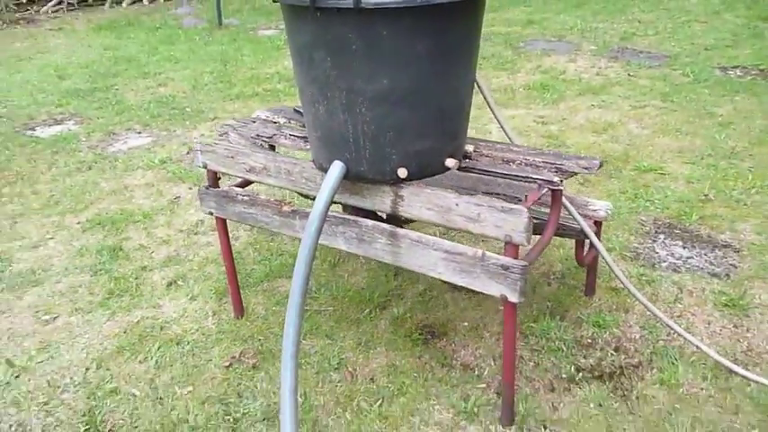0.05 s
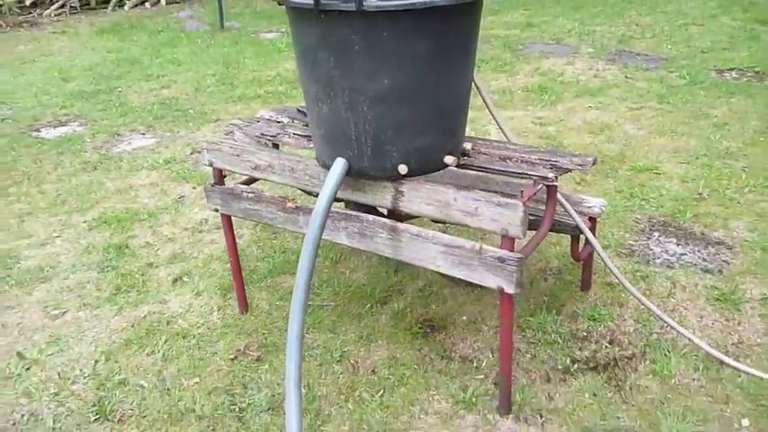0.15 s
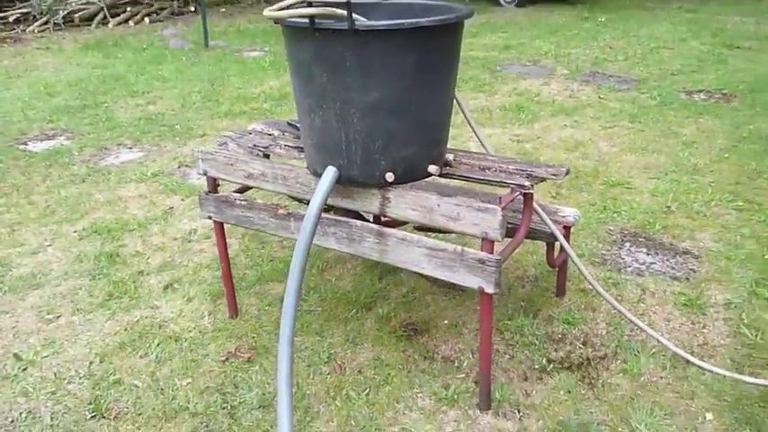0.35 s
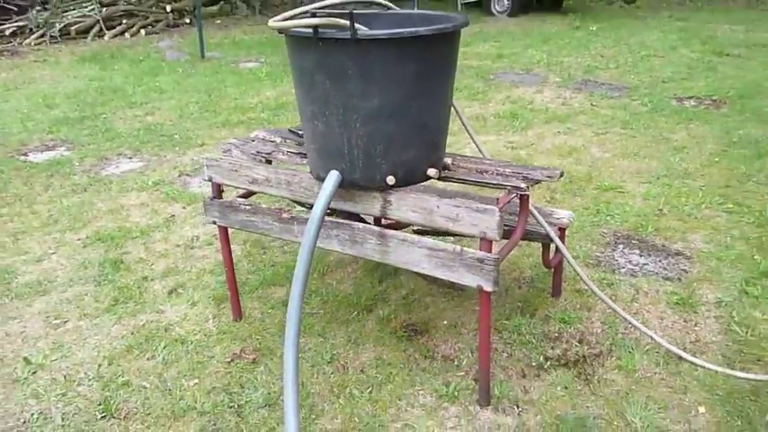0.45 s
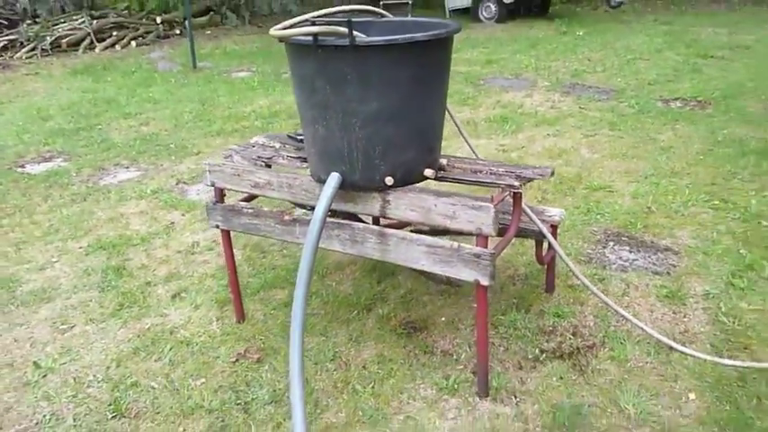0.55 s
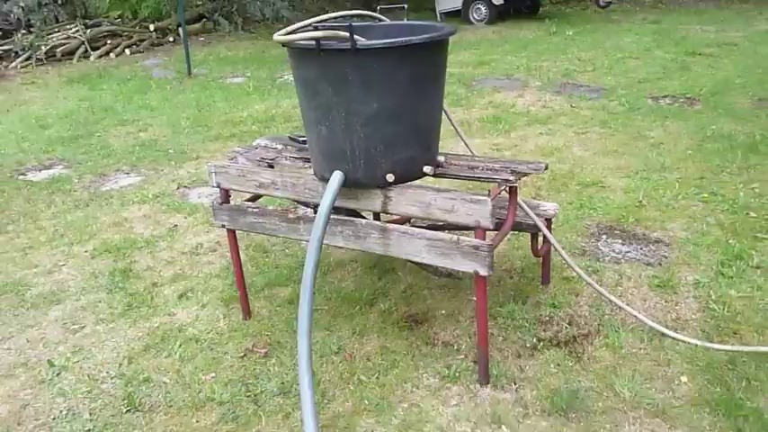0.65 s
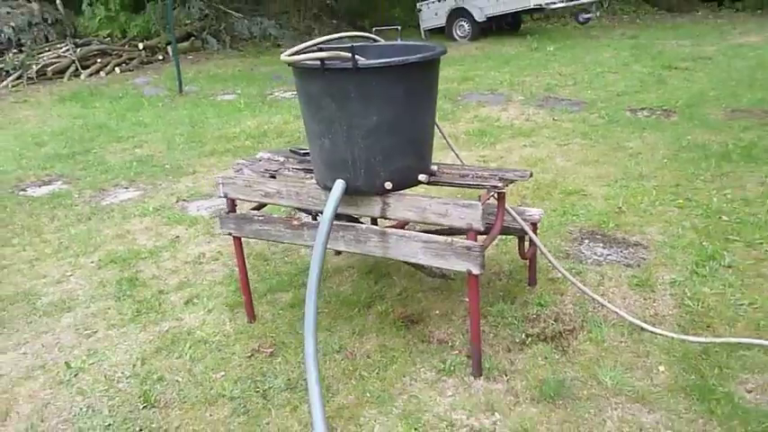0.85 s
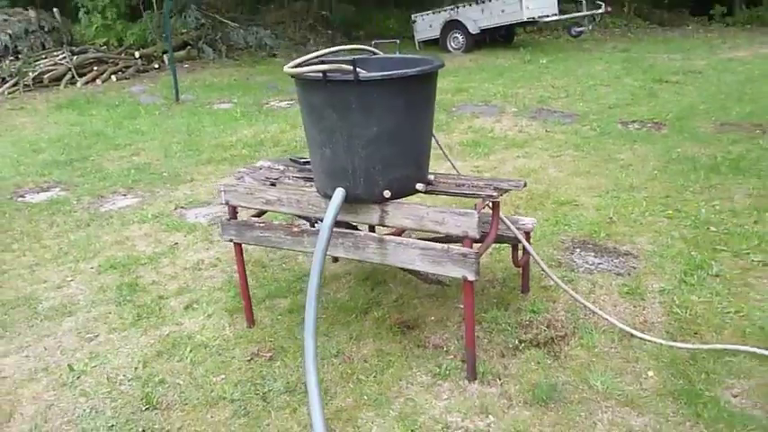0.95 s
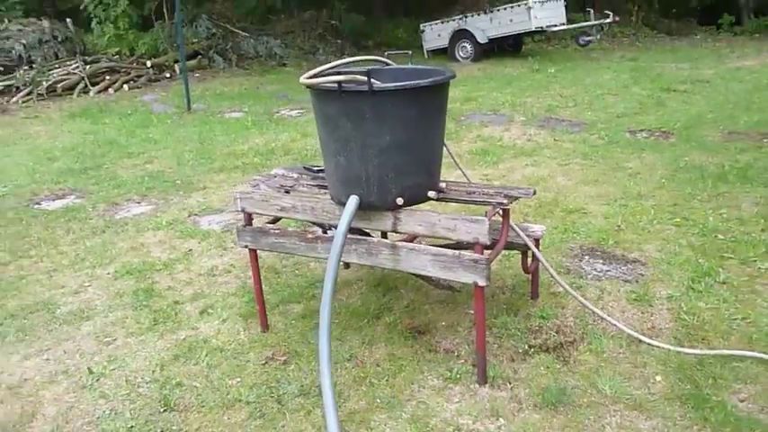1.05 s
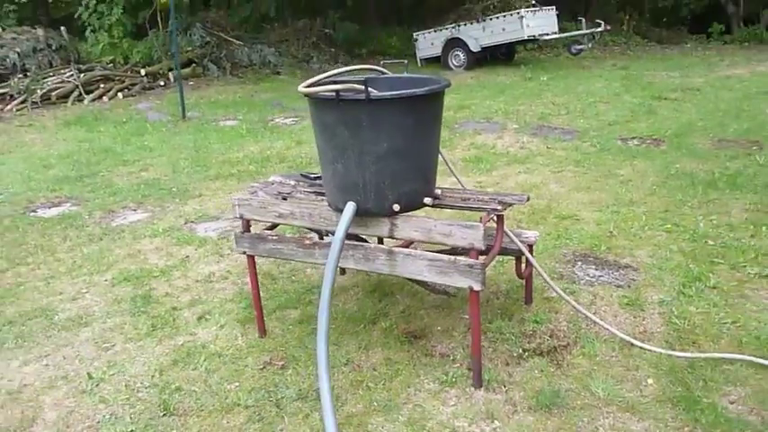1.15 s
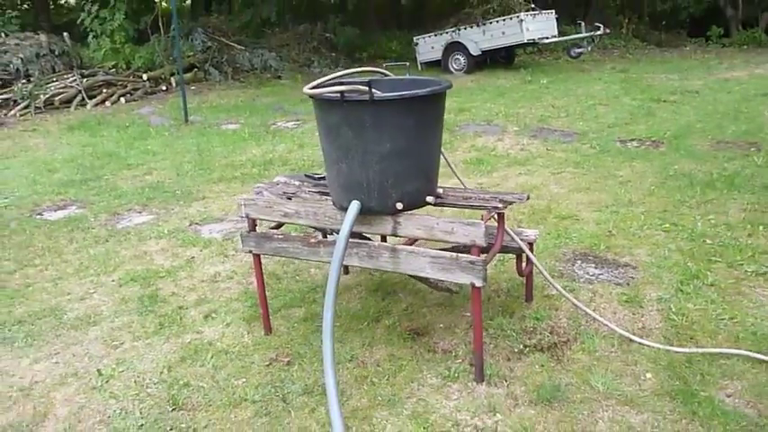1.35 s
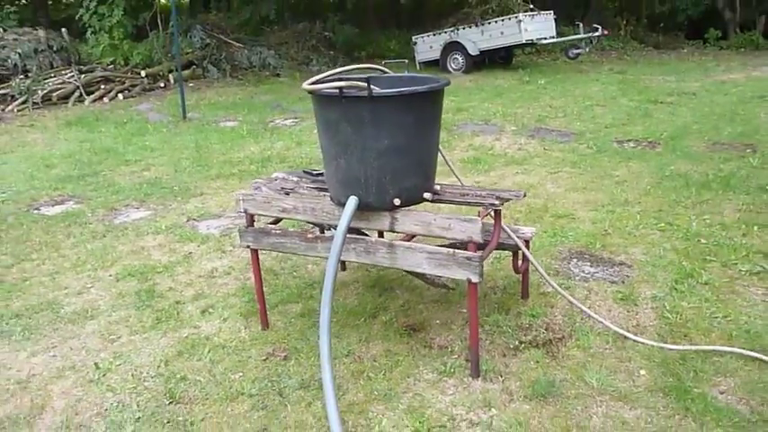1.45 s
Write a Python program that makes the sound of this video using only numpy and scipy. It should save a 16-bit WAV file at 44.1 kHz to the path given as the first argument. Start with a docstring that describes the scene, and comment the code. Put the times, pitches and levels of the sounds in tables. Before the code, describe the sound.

Something plastic knocks once, hard and dry, close to the microphone, then settles with a softer knock and small ticks. Behind it, water runs quietly into a tub on a lawn, with light wind and a distant motor hum.

```python
"""Plastic knock by a filling tub

A pump feeds a tub on a lawn: water rushes steadily, a motor hums far off and wind stirs the trees.
Up close, a short grainy swell rises into one hard, dry knock of something plastic, which settles with
a softer knock and small ticks. The hard knock ducks the recorder's gain, which creeps back up."""
import sys
import numpy as np
from scipy import signal
from scipy.fft import rfft, irfft
from scipy.io import wavfile

SR = 44100
rng = np.random.default_rng(int(sys.argv[2]) if len(sys.argv) > 2 else 0)


def digitize_waveform(pressure):
    """Quantize a signal to 16-bit integers and store it at the path in sys.argv[1].

    Rows of a 2-D input are taken as channels; values are limited to [-1, 1].
    """
    field = np.atleast_2d(pressure).T
    bounded = np.clip(field, -1, 1)
    quanta = np.round(bounded * 32767).astype(np.int16)
    wavfile.write(sys.argv[1], SR, quanta)


N = 66150
T = np.arange(N) / SR

# The plastic's modes in the hard knock. Each row: pitch in Hz, level in dB, swell and fade time in ms.
KNOCK_MODES = [(191, -18, 1.14), (414, -12.5, 0.69), (667, -2, 0.53), (2025, -18, 0.31), (2518, -3, 0.37),
               (3085, -18, 0.9), (5490, -3.5, 0.3)]
KNOCK_S, THUMP_BELOW_HZ, THUMP_LAG_MS = .21805, 1000, 0.33
KNOCK_LOW_CUT_HZ = 123
# The grainy swell into the knock. Each row: time in seconds, level in dB.
SWELL_LEVEL = [(.165, -63), (.184, -45.5), (.2, -46.5), (.21, -33.5), (.2135, -24), (.2175, -28),
               (.223, -47.5), (.23, -72)]
# The tone of the grit in the swell and the taps. Each row: frequency in Hz, gain in dB.
GRIT_COLOUR = [(100, -0.5), (600, 1.5), (1500, 0), (3200, -1), (4500, -3.5), (6200, -2.5), (8000, -27)]
GRAINS_PER_S = 10000
# Lighter contacts with two resonances. Each row: start in seconds, lower pitch in Hz, its level in dB,
# upper pitch in Hz, its level in dB, swell and fade time in ms.
TAPS = [(0.1829, 420, -29.5, 1400, -33.5, 0.57), (.303, 1900, -46, 2300, -36, 2.0),
        (.3147, 524, -15, 1170, -25.5, 0.62), (0.3164, 1760, -36.5, 2270, -33, 2.05),
        (0.3238, 2210, -21, 3340, -21, 0.48), (.3323, 700, -33.5, 5650, -39, .35),
        (0.3642, 3900, -22, 6600, -21, 0.15), (0.593, 2960, -29.5, 5400, -29.5, .7),
        (0.5964, 3040, -30.5, 5860, -35, 0.6), (.6888, 3520, -40, 7100, -36.5, 0.33),
        (.6997, 3000, -44, 6450, -34.5, 0.21), (0.7331, 3650, -27.5, 4660, -27, 0.24),
        (0.7566, 3300, -49, 7200, -44.5, 1.1), (0.7796, 5500, -54, 7300, -35.5, 0.31),
        (.9205, 150, -29, 360, -31, 1.13), (1.104, 3540, -39, 5540, -37, 0.26),
        (1.346, 4500, -42, 7000, -36, 0.17), (1.43, 4000, -46, 7100, -37.5, 0.55),
        (1.462, 2970, -40, 3340, -28, 0.45)]
TAP_GRIT_DB, TAP_GRIT_MS = -9.5, 2.3

# The steady flow of water. Each row: time in seconds, level in dB.
WATER_LEVEL = [(0, -48.5), (.18, -50), (.26, -49), (.7, -49.5), (1.1, -51), (1.5, -50.5)]
# The water's bright hiss. Each row: frequency in Hz, gain in dB.
WATER_COLOUR = [(300, -18), (1000, -7), (2200, 1), (3300, 1), (4500, -1.5), (6500, -2.5), (8000, -9)]
DROPS_PER_S, DROP_CYCLES, DROP_DB, DROP_SPREAD_DB = 900, 6, -7, 3.5

# Gentle swells of wind in the trees. Each row: time in seconds, level in dB.
WIND_LEVEL = [(0, -45.5), (.2, -45.5), (.45, -44.5), (.75, -45.5), (1.0, -43.5), (1.25, -45), (1.5, -43)]
# The wind's midrange rush. Each row: frequency in Hz, gain in dB.
WIND_COLOUR = [(150, -14.5), (400, -7), (700, -2.5), (1050, 0.5), (1600, -5.5), (2300, -9), (3300, -26),
               (8000, -40)]
# The rise and fall of the air's rumble. Each row: time in seconds, level in dB.
RUMBLE_LEVEL = [(0, -50), (.17, -47.5), (.4, -45.5), (.7, -46.5), (.95, -45.5), (1.2, -49.5), (1.5, -47)]
# The rumble's dark tone. Each row: frequency in Hz, gain in dB.
RUMBLE_COLOUR = [(25, -15), (50, -0.5), (115, 1), (180, -1.5), (350, -4), (550, -7), (1200, -34.5),
                 (4000, -49)]

# The motor's harmonics. Each row: multiple of the hum's pitch, relative level in dB.
HUM_HARMONICS = [(1, -0.5), (2, -5)]
# The hum's slow swell. Each row: time in seconds, level in dB.
HUM_LEVEL = [(0, -58), (.3, -57), (.5, -52), (1.1, -50.5), (1.5, -54.5)]
HUM_HZ, HUM_WANDER, HUM_SWING_DB = 61.5, .04, 3

GAIN_KNEE_DB, GAIN_SLOPE, GAIN_RECOVERY_DB_PER_S, GAIN_ATTACK_S = -21, 0.22, 3.0, 0.0093
NOTCH_HZ, NOTCH_Q, OVERLOAD_TOP, CUTOFF_HZ = 2900, 17, .8, 7650


def knock():
    """The hard hit: the contact cracks, and the body gives way just after with a thump."""
    lag_s = THUMP_LAG_MS / 1000
    return sum(ring(KNOCK_S + lag_s * (hz < THUMP_BELOW_HZ), hz, db, ms) for hz, db, ms in KNOCK_MODES)


def swell():
    """A short, grainy swell of noise rises into the knock."""
    gate = T < SWELL_LEVEL[-1][0]
    return level(SWELL_LEVEL) * gate * coloured(grains(GRAINS_PER_S, spread_db=2), GRIT_COLOUR)


def taps():
    """Soft knocks and ticks: each contact rings two resonances and rubs briefly as it settles."""
    rings = rub = 0
    for start, low_hz, low_db, high_hz, high_db, ms in TAPS:
        rings += ring(start, low_hz, low_db, ms) + ring(start, high_hz, high_db, ms)
        fade = (T > start) * np.exp(-np.abs(T - start) * 1000 / TAP_GRIT_MS)
        rub += from_db(high_db + TAP_GRIT_DB) * fade
    grit = coloured(grains(GRAINS_PER_S, spread_db=2), GRIT_COLOUR)
    return rings + rub * grit


def water():
    """Water runs into the tub: a smooth hiss dotted with tiny splashes, each a short pitched ping."""
    clicks = grains(DROPS_PER_S, DROP_SPREAD_DB)
    pitches_hz = np.geomspace(900, 7500, 16)
    pitch_index = rng.integers(0, len(pitches_hz), N)
    drops = 0
    for k, hz in enumerate(pitches_hz):
        decay = from_db(-60 * hz / (DROP_CYCLES * SR))  # 60 dB down after DROP_CYCLES cycles
        angle = 2 * np.pi * hz / SR
        hits = clicks * (pitch_index == k) + 1e-18
        drops += signal.lfilter([0, np.sin(angle)], [1, -2 * decay * np.cos(angle), decay ** 2], hits)
    hiss = coloured(rng.standard_normal(N), WATER_COLOUR)
    return level(WATER_LEVEL) * (hiss + from_db(DROP_DB) * rms_one(drops))


def wind():
    """Air stirs the trees: a broad, lightly fluttering rush over a bed of low rumble."""
    rush = coloured(rng.standard_normal(N), WIND_COLOUR) * from_db(0.73 * drift(12))
    rumble = coloured(rng.standard_normal(N), RUMBLE_COLOUR) * from_db(1.4 * drift(11))
    return level(WIND_LEVEL) * rush + level(RUMBLE_LEVEL) * rumble


def motor():
    """A far-off motor hums low; its pitch wanders and each harmonic wavers in level on its own."""
    pitch_hz = HUM_HZ * (1 + HUM_WANDER * drift(9.5))
    phase = 2 * np.pi * np.cumsum(pitch_hz) / SR
    hum = sum(from_db(db + HUM_SWING_DB * drift(9)) * np.sin(k * phase) for k, db in HUM_HARMONICS)
    return level(HUM_LEVEL) * np.sqrt(2) * hum


def ring(start, hz, db, ms):
    """A heavily damped resonance that swells to its peak in `ms` and dies away."""
    t = np.maximum(T - start, 0)
    age = t * 1000 / ms
    return from_db(db) * age * np.exp(1 - age) * np.sin(2 * np.pi * hz * t)


def grains(per_s, spread_db):
    """A random scatter of clicks, uneven in size."""
    sizes = from_db(spread_db * np.minimum(rng.exponential(1, N), 4))
    return sizes * rng.choice([-1, 1], N) * (rng.random(N) < per_s / SR)


def coloured(x, colour):
    """Shape a steady sound with an EQ curve and bring it to rms 1."""
    hz, db = np.transpose(colour)
    bins_hz = np.maximum(np.fft.rfftfreq(N, 1 / SR), 1)
    gain = from_db(np.interp(np.log(bins_hz), np.log(hz), db)) * (bins_hz < CUTOFF_HZ + 1000)
    return rms_one(irfft(rfft(x) * gain, N))


def drift(rate_hz):
    """A smooth random wobble of rms 1, mostly slower than `rate_hz`."""
    hop, warm_up = 40, 2000
    pole = np.exp(-2 * np.pi * rate_hz * hop / SR)
    noise = rng.standard_normal(N // hop + warm_up + 2)
    slow = signal.lfilter([1], [1, -2 * pole, pole ** 2], noise)[warm_up:]
    return np.interp(np.arange(N) / hop, np.arange(len(slow)), rms_one(slow))


def level(rows):
    """A fader ride through points of seconds and dB."""
    return from_db(np.interp(T, *np.transpose(rows)))


def from_db(db):
    """Decibels to gain."""
    return 10 ** (np.asarray(db) / 20)


def rms_one(x):
    """Scale to rms 1."""
    return x / np.sqrt(np.mean(x ** 2) + 1e-20)


def scene():
    """The mono mix in open air, no echo; a low-cut filter trims deep bass from swell, knock and taps."""
    low_cut = signal.butter(2, KNOCK_LOW_CUT_HZ, "high", fs=SR, output="sos")
    foreground = signal.sosfilt(low_cut, swell() - knock() + taps())
    return (foreground + wind() + water() + motor())[None]


def record(dry):
    """The recorder ducks on peaks and creeps back, cuts a narrow notch, clips and trims the top."""
    peak_db = 20 * np.log10(np.abs(dry[0]) + 1e-9)
    duck_db = GAIN_SLOPE * np.maximum(peak_db - GAIN_KNEE_DB, 0)
    recovery_db = GAIN_RECOVERY_DB_PER_S * T
    held_db = np.maximum.accumulate(duck_db + recovery_db) - recovery_db
    attack = np.exp(-1 / (GAIN_ATTACK_S * SR))
    ducked = dry * from_db(-signal.lfilter([1 - attack], [1, -attack], held_db))
    notched = signal.lfilter(*signal.iirnotch(NOTCH_HZ, NOTCH_Q, fs=SR), ducked)
    clipped = np.clip(notched, -OVERLOAD_TOP, OVERLOAD_TOP)
    top_cut = signal.ellip(8, .05, 50, CUTOFF_HZ, fs=SR, output="sos")
    return signal.sosfiltfilt(top_cut, clipped)


dry = scene()
out = record(dry)
digitize_waveform(out)
```